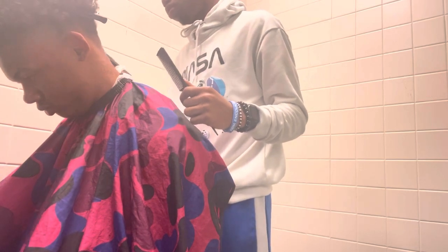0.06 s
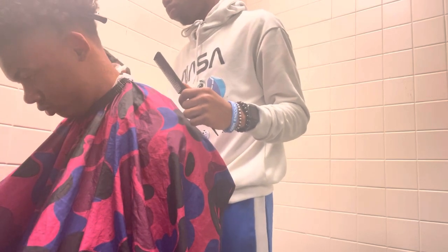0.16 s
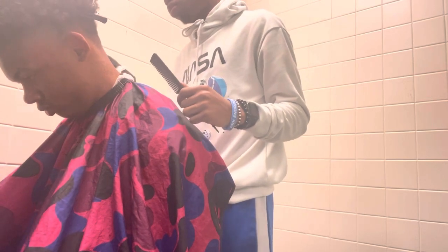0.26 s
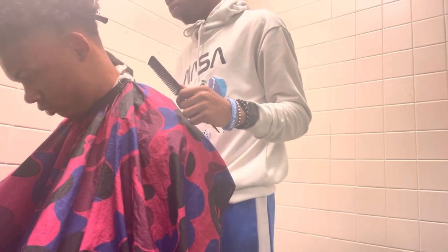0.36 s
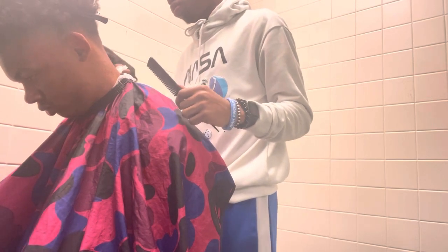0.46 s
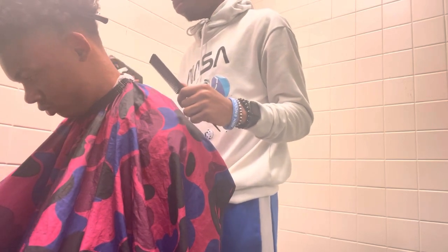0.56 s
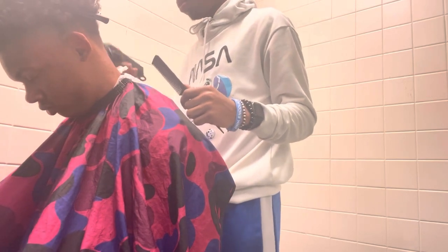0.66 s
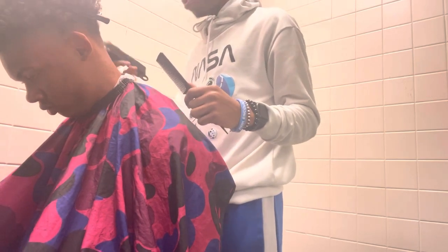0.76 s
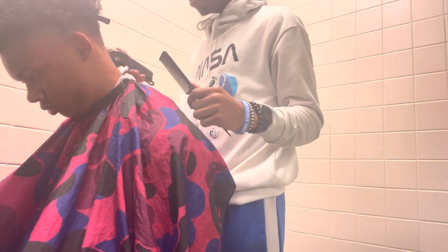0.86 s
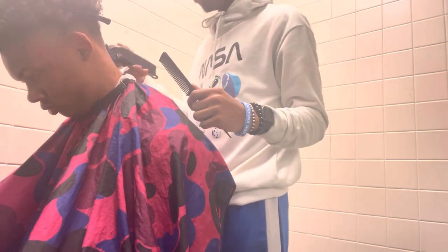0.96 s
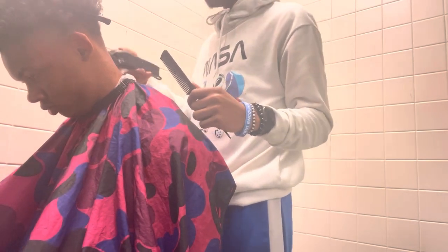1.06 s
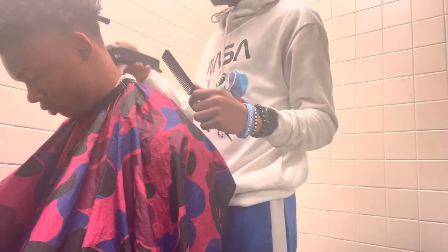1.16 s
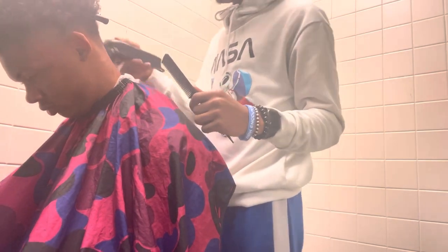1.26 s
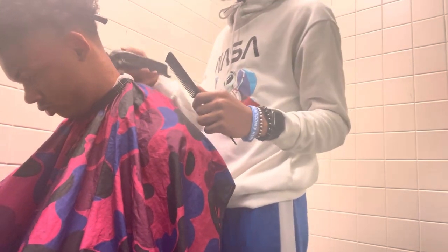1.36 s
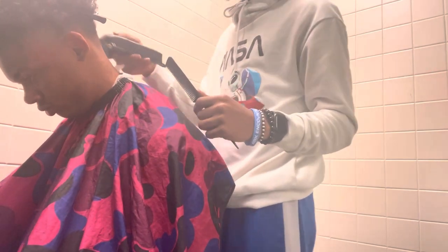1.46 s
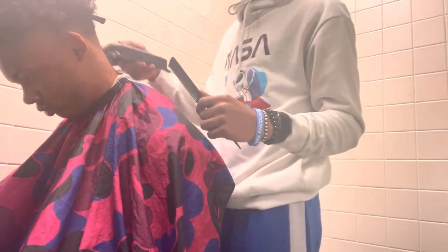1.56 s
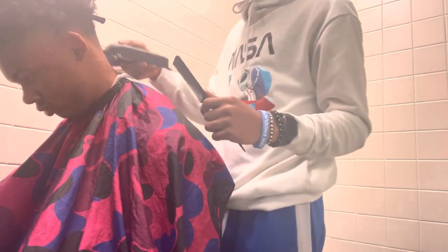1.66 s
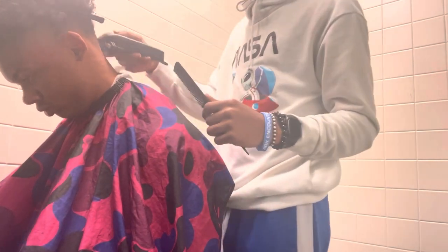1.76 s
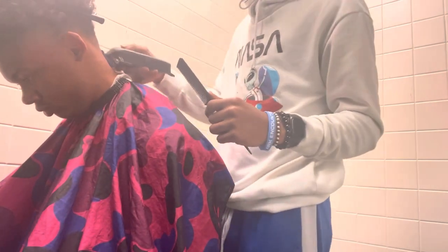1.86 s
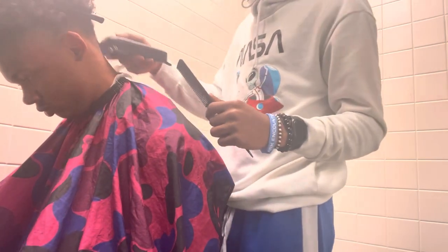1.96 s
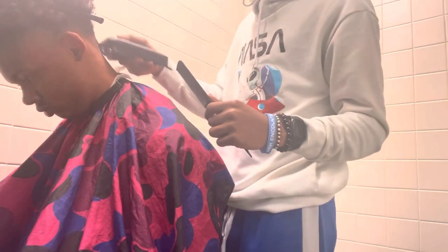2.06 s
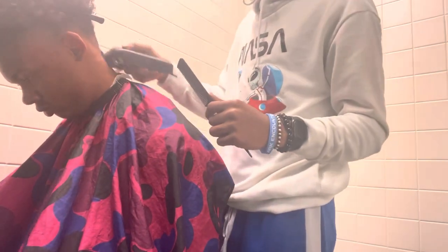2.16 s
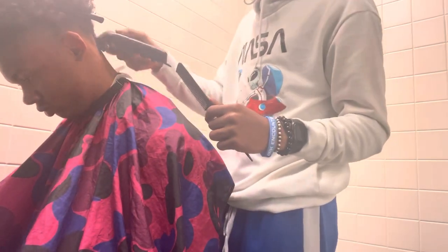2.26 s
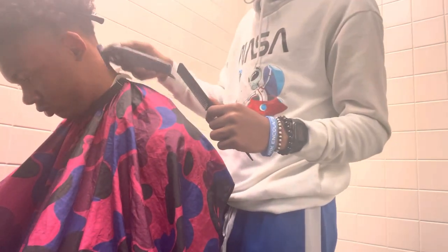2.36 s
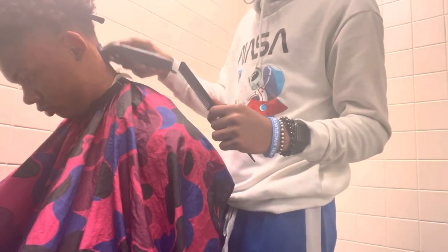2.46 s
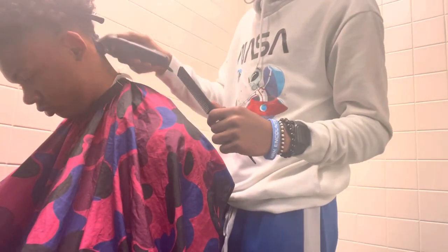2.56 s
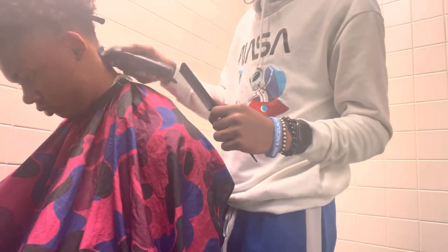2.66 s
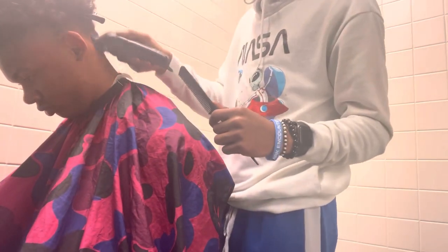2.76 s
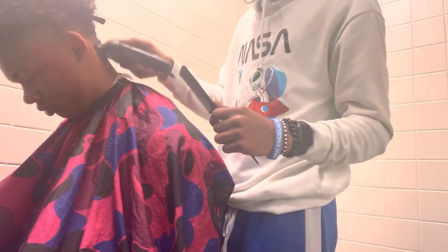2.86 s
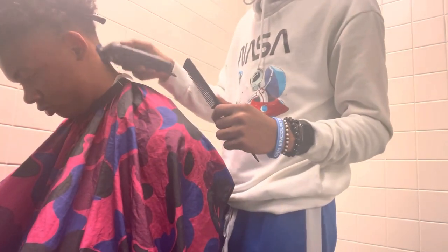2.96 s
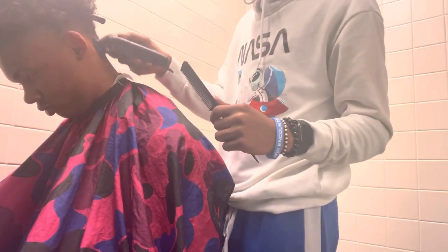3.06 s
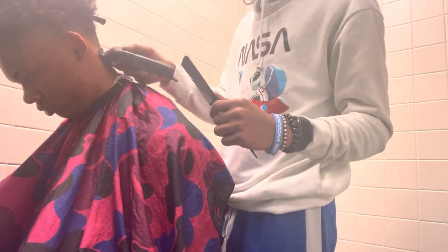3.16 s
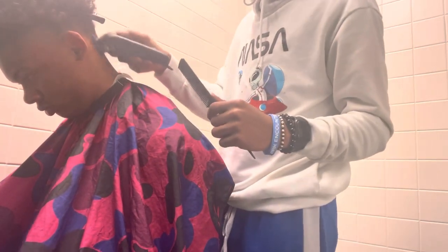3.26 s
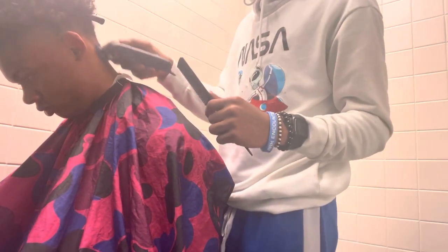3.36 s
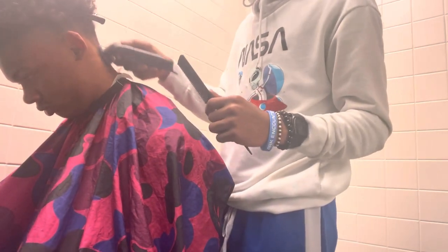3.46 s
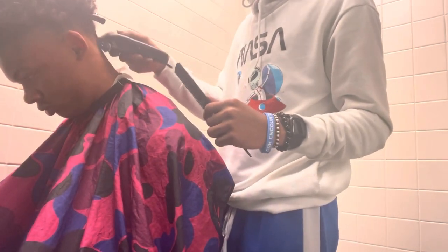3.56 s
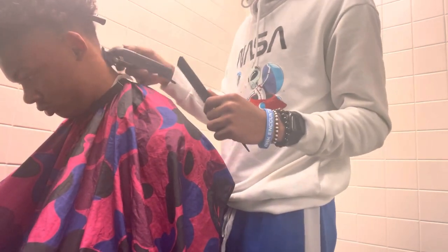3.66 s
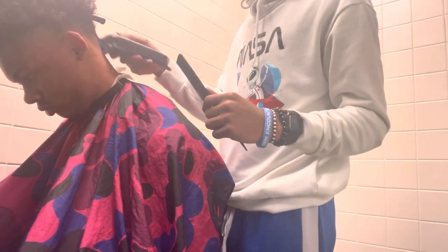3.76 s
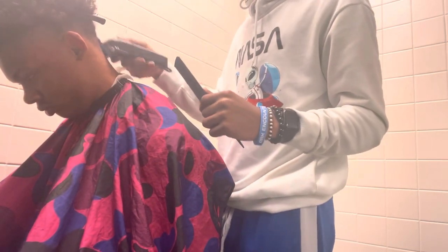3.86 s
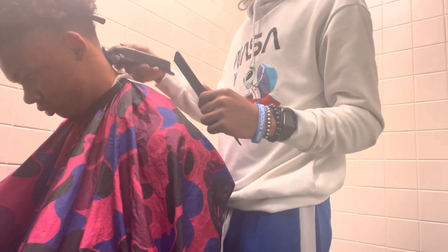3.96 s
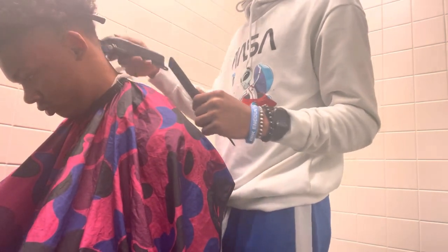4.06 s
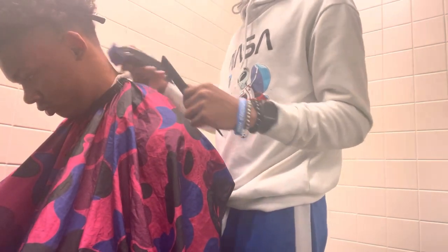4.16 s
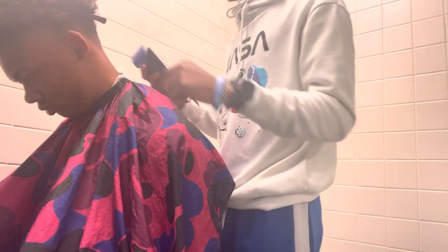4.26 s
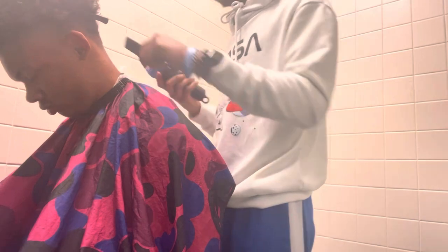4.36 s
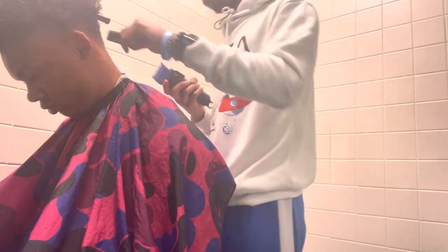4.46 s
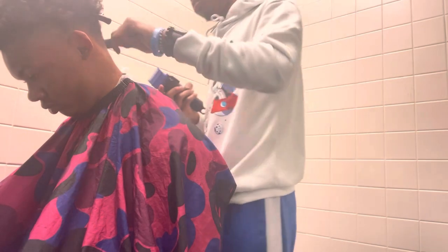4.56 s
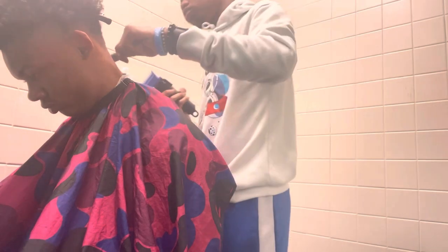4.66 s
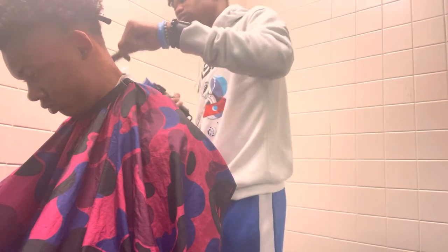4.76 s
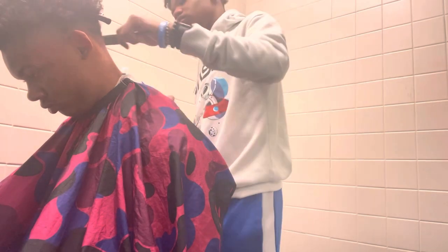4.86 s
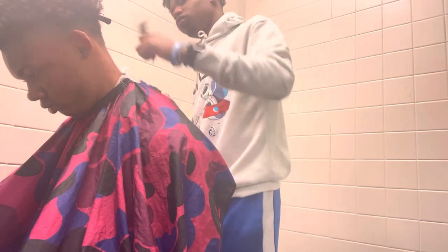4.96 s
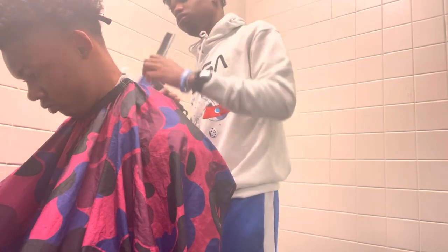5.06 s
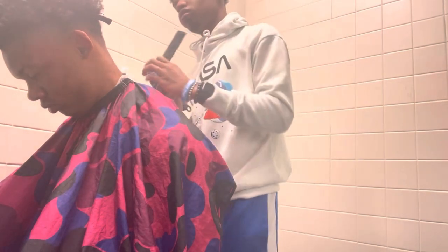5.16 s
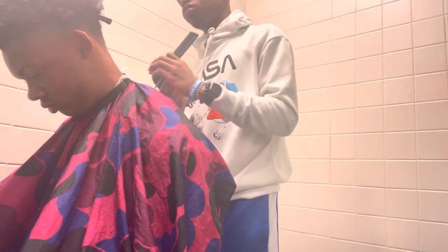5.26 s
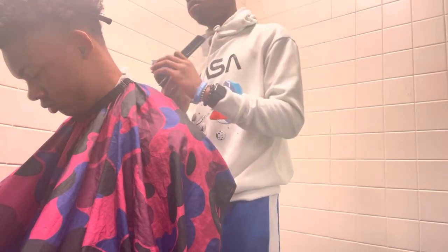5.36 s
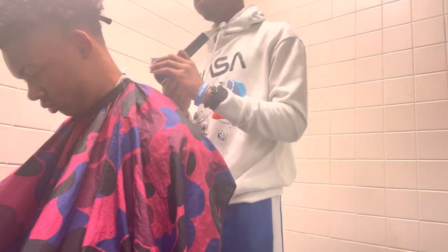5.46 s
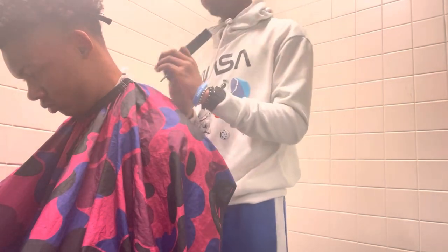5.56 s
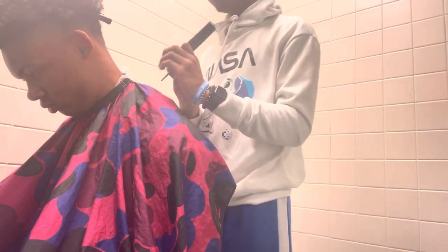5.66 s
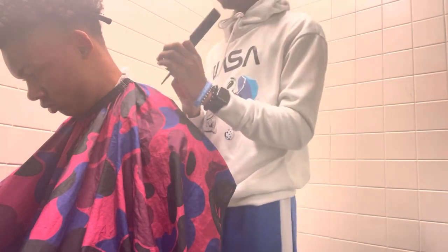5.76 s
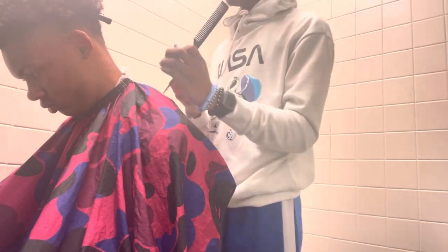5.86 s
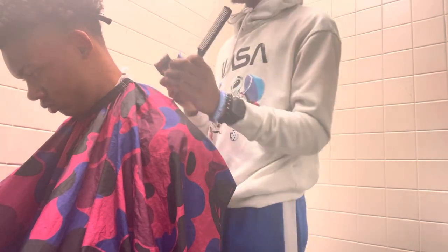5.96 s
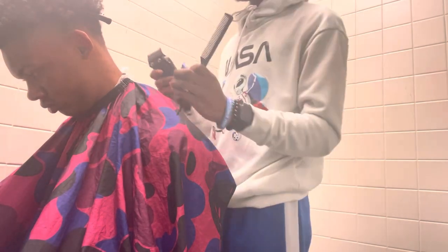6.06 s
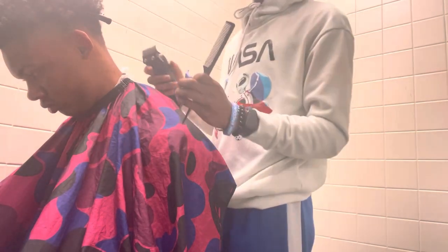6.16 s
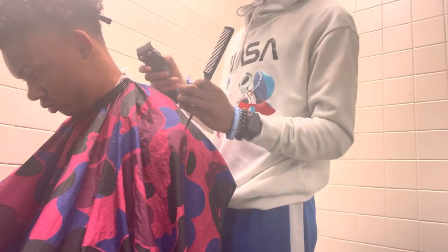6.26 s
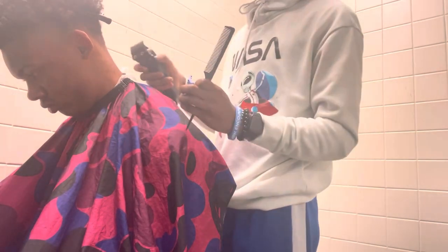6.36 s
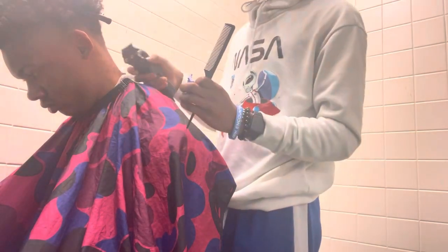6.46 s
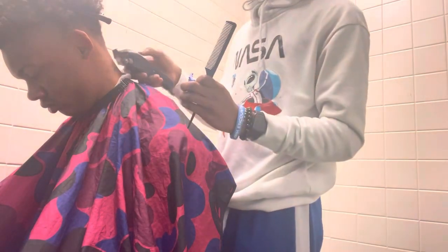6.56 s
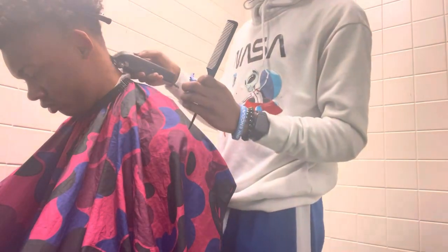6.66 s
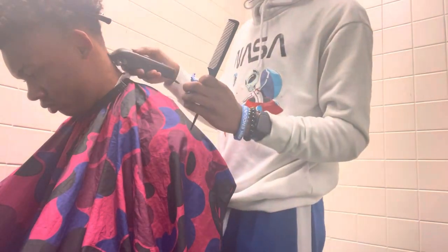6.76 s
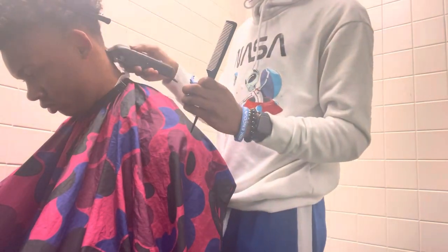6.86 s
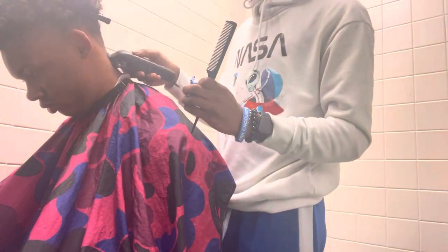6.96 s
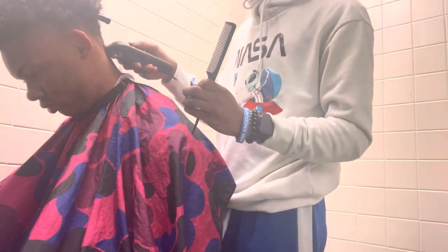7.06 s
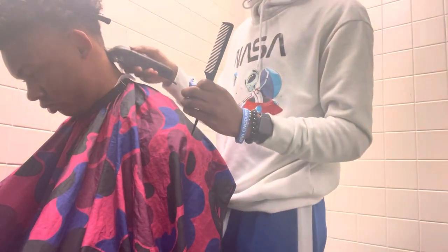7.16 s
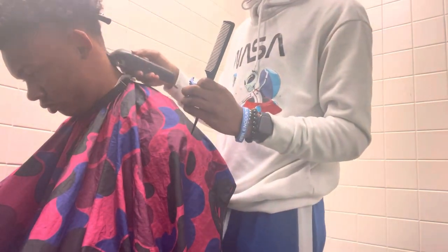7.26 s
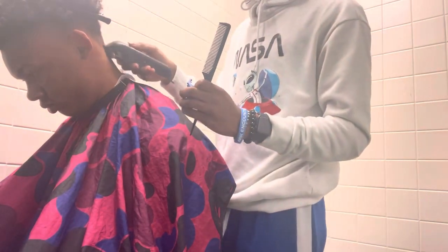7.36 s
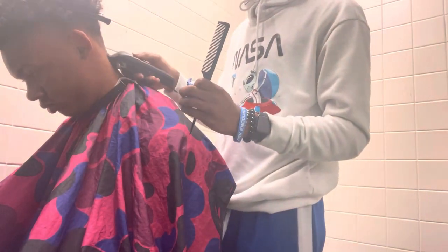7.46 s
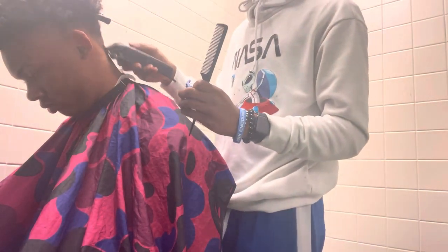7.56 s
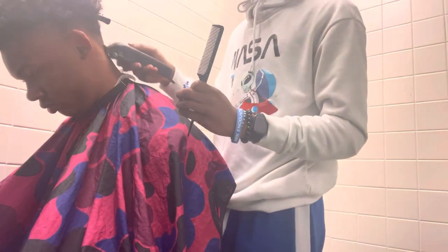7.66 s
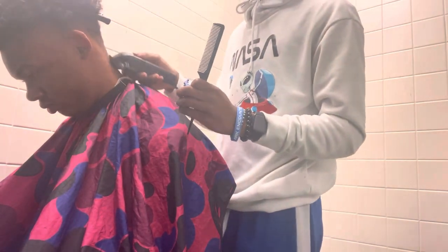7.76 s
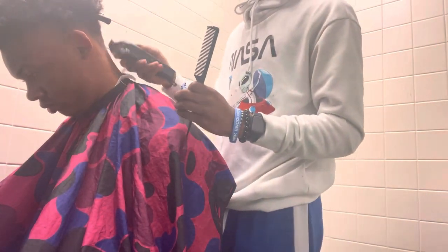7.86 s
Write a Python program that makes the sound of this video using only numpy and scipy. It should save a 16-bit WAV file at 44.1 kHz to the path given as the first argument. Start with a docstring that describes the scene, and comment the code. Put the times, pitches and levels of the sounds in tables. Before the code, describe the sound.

Close stereo pickup in a small, hard tiled room with a faint low ventilation rumble throughout. From 0 s electric hair clippers buzz at a nearly constant low pitch, around 120 strokes a second, with a raspy middle, metallic sizzle and fine crunch of hair. Gentle rocking makes the timbre pulse nearly four times a second; from about 1.2 to 4.1 s it grows fuller and more knocking as the blade lies against the head. Around 4.3 s there is a small tap and the buzz thins as it is lifted. At 4.9 s the switch snaps sharply and the blades clatter briefly to rest. Between 5.2 and 5.8 s only light taps, scuffs and dull hollow knocks are heard, with a short room tail. At 5.9 s crisp clicks switch it on, the blades rattle up within a fraction of a second, and the pulsing, crackling buzz continues until about 7.9 s.

```python
"""A small tiled room: electric hair clippers buzz at about 120 strokes a second and crackle through hair.
Blade and housing partials make the buzz; they shift as the head is laid onto the nape and rocked.
The switch snaps off and the blades clatter to rest, filtered noise pulsing with the slowing strokes.
The head is handled for a second in taps and knocks, then the switch snaps on and the blades rattle up.
Clicks, taps and clatter excite the room's tail; shaped noise is a low ventilation rumble underneath."""
import sys
import numpy as np
from scipy import signal
from scipy.fft import rfft, irfft, next_fast_len
from scipy.io import wavfile
from scipy.ndimage import uniform_filter1d, map_coordinates

SR = 44100
rng = np.random.default_rng(int(sys.argv[2]) if len(sys.argv) > 2 else 0)


def persist_wave(psi):
    """Save psi, clipped to +-1, as 16-bit WAV."""
    counts = np.round(np.clip(psi, -1, 1) * 32767).astype(np.int16)
    wavfile.write(sys.argv[1], SR, np.atleast_2d(counts).T)


N = 349259
T = np.arange(N) / SR
FRAME = 441  # samples per control frame
FRAME_T = np.arange(N // FRAME + 2) * FRAME / SR
CUTOFF_HZ = 14000

# ventilation colour: [f/Hz, relative level/dB per Hz]
VENT_COLOUR = [(18, -35), (28, -2), (40, -6), (54, 2.5), (75, -4.5), (100, -14.5), (120, -2.5),
               (150, -15.5), (185, -11), (240, -14), (330, -24), (600, -31.5), (1500, -46), (14000, -60.5)]
VENT_DB = -49
# likeness of the ventilation at the two microphones: [f/Hz, likeness 0-1]
VENT_LIKENESS = [(60, .98), (130, .92), (260, .55), (600, .1), (2000, 0)]

# the motor is switched off, switched on, and back at full swing (s)
OFF_S, CLOSED_S, ON_S = 4.895, 5.9, 6.08
SPIN_UP_S = .045  # time constant of the swing building up
# how far the clipper is laid over towards the nape, 0 = lifted clear: [t/s, angle/degrees]
ANGLE = [(0, 15), (.4, 18), (.9, 34), (1.5, 52), (2, 60), (2.4, 75), (2.8, 80), (3.4, 77), (3.8, 61),
         (4.14, 58), (4.25, 38), (4.5, 2), (4.86, 0), (6.06, 36), (6.35, 36), (6.75, 78), (7.45, 79),
         (7.9, 52)]
# the head counts as lifted below the first angle and as laid on above the second (degrees)
LAID_DEGREES = (35, 75)
# spells of rocking against the skin: [first push t/s, last push t/s, pushes per s, relative depth]
ROCKING = [(.19, 1.0, 3.75, .75), (1.26, 4.04, 3.957, 1.1), (6.3, 6.85, 3.6, .5), (7.11, 7.85, 4.05, .85)]
# stroke rate running free, and its sag as the head is laid on and with each push
FREE_HZ, SAG_HZ_PER_DEGREE, SAG_HZ_PER_PUSH = 119.75, .0035, .17

# clean partials of armature and housing: [order, level gained on a push/dB, lag behind the push/s]
HOUSING = [(1, 1.6, -.02), (5, -1, 0), (6, .5, .03), (8, -2, .04), (9, 1.3, 0), (11, -2.6, .054),
           (12, 1, 0), (19, 3.3, 0), (15, -1.9, .045)]
# directivity of all but the last housing partial: one row each, [level/dB at each angle below]
DIRECTIVITY = [(-66, -51, -60, -52, -49.5), (-56, -55, -55, -67, -61), (-58, -57, -61, -54, -47.5),
               (-57, -48.5, -49, -57, -60), (-53.5, -62, -49.5, -50, -51), (-64, -61, -56, -52, -52.5),
               (-55, -54, -52, -56, -59), (-65, -58, -54, -54, -53.5)]
DIRECTIVITY_DEGREES = (0, 20, 40, 60, 80)
# the last housing partial sits on the resonance of the head: [t/s, level/dB]
RING = [(0, -54.5), (1.1, -51), (1.3, -47), (1.48, -42.5), (2.08, -41), (2.4, -47), (3.45, -49), (3.8, -41),
        (4.15, -43), (4.26, -64), (4.86, -60), (6.06, -58), (7.9, -58)]
HOUSING_GAIN_DB = 0.38  # added to both tables above
HOUSING_WAVER = .24  # how much room echoes make the housing partials waver
# place of each housing partial between the microphones:
# [left-right level/dB lifted, laid on, left leads by/radians lifted, laid on]
PLACES = [(0, -.5, 0, -.1), (8, 0, 1.4, 1.5), (0, 9, 2.8, 1.9), (0, 5, 2.1, 3), (5, 15, .7, 1.8),
          (2, 7, .2, .9), (1, 2, 2.1, 2), (0, -1, .4, .7), (-1, 0, -.3, -.1)]

# colour of the blade partials; from order 12 up only its shape within a register counts:
# [f/Hz, level/dB per partial]
BLADE_COLOUR = [(240, -62.5), (360, -68.5), (480, -67.5), (840, -58), (1200, -57.5), (1700, -59),
                (2600, -59.5), (3200, -65.5), (3700, -63), (4300, -61), (5000, -65.5), (6900, -57),
                (8600, -66.5), (12600, -70), (14200, -74)]
# blade partials that stand out or are nearly missing: [order, relative level/dB]
STANDING = [(10, 0), (16, -0.5), (18, -1), (21, -0.5), (22, 3), (23, -1.5), (27, 3.5), (30, -2.5),
            (31, -5.5), (33, -0.5), (36, 1.5), (37, -6), (38, -9), (39, 2.5), (40, -6), (42, 3), (43, -20),
            (44, 2), (45, -2), (47, 4), (48, -2.5), (50, 1), (51, -13), (52, 5), (56, 1), (58, 6),
            (60, -13), (64, 5.5)]
# levels of the three registers of the blade rattle: [t/s, knock level/dB, rasp level/dB, sizzle level/dB]
RATTLE = [(0, -48, -47.5, -49.5), (0.65, -51, -46.5, -50.5), (1.1, -46.5, -44.5, -48.5),
          (1.27, -42, -44.5, -46.5), (1.55, -45.5, -46.5, -46), (2.05, -47, -45.5, -47),
          (2.3, -41.5, -47, -48), (2.7, -40, -47, -48), (3.5, -41.5, -47.5, -48), (4.2, -50.5, -45.5, -47),
          (4.5, -57, -53, -48), (4.86, -53, -50, -49.5), (6.06, -51, -51, -47), (6.7, -46, -48.5, -47.5),
          (7.25, -46, -51, -49.5), (7.9, -47.5, -46.5, -47.5)]
RATTLE_PUSH_DB = (-2.3, -1.3, 0.3)  # what a push adds to knock, rasp and sizzle
# likeness of the buzz at the two microphones: [f/Hz, likeness 0-1]
BLADE_LIKENESS = [(1000, 0.8), (4000, 0.35), (8000, 1), (13000, 1)]
# phase by which blade and hair reach the left microphone first: [f/Hz, lead/radians]
LEAD = [(0, 0), (950, 2.7), (1290, 0.5), (1810, 6.5), (3010, 7.1), (5250, 13.8), (6630, 15.4), (7490, 14.7),
        (9560, 16.1), (11100, 18.9), (12300, 18.9), (13400, 21.8), (15200, 22.0), (16100, 24.7)]
# balance of the blade partials: [f/Hz, left-right level/dB]
TILT = [(240, -7.5), (400, 0.5), (1000, 0), (1550, 7), (1900, 1), (4500, 2), (6000, 0), (9000, 1.5),
        (13000, 0)]
# strength of the return stroke, and how fast the paths of the partials change (per s at 1 kHz)
BACK_STROKE, CHANGE_PER_S = .15, 1.6
FLICKER = .18  # how much loose play makes the partials flicker
# the resonance of the blade plate shifts with the grip: [t/s, f/Hz]
PLATE = [(0, 2700), (.22, 3200), (.5, 2700), (.8, 3700), (.95, 3000), (1.25, 2400), (1.85, 3150),
         (2.3, 2750), (3.4, 2750), (3.85, 3100), (4.1, 2750), (4.3, 3750), (4.62, 3700), (4.86, 2700),
         (6.06, 3400), (6.4, 3850), (6.55, 2850), (7.9, 2800)]
PLATE_DB, PLATE_WIDTH_HZ = 6, 300
# two resonances of the head: [f/Hz, width/Hz, relative level/dB, level gained on a push/dB]
KNOCK_MODES = [(1595, 210, 0, -7), (2070, 270, -4.5, 7.5)]
KNOCK_SKIRT = .08  # gain of the knock outside its resonances
KNOCK_DIRECT = (.15, .55)  # share of the knock straight from the head: lifted, laid on
# echo of the blade off the skin: strength, and a delay that grows with the angle
SKIN_ECHO, SKIN_DELAY_S, SKIN_DELAY_S_PER_DEGREE = 0.11, 0.00075, .000004
# single partials ring out for a moment as the clipper turns: [t/s, order, level/dB, spread/s]
FLARES = [(.98, 12, -52, .06), (1.26, 19, -50, .06), (1.26, 17, -49, .06), (1.4, 14, -49, .2),
          (2.53, 17, -47, .05), (4.3, 9, -52, .08), (4.31, 31, -55, .07), (4.31, 33, -56, .06),
          (4.34, 12, -46, .06), (4.62, 31, -55, .07), (4.78, 10, -48, .1), (6.27, 50, -57, .08),
          (6.32, 22, -52, .1), (6.36, 32, -54, .11), (7.1, 39, -61, .35), (7.35, 19, -50.5, .5)]

# colour of the hair being cut: [f/Hz, relative level/dB per Hz]
CUT_COLOUR = [(200, -52.5), (500, -18.5), (1000, -9), (1500, -3), (2000, -1), (2700, -6), (3500, -5),
              (5000, -14), (7000, -4.5), (9000, -34.5), (13000, -14.5), (14500, -50)]
# crunch when lifted clear, before the gain in cutting(), and what a push and each degree of lean add
CUT_DB, CUT_PUSH_DB, CUT_DB_PER_DEGREE = -67.2, 3, .09
# the teeth bite into thicker tufts: [t/s, level/dB before the gain in cutting()]
BITES = [(.48, -59), (1.8, -56), (2.24, -63), (3.08, -64), (3.36, -72), (7.085, -57), (7.39, -61.5),
         (7.58, -65), (7.635, -55.5)]
BITE_S = 0.04  # spread of each swell
# steel sliding on steel: [f/Hz, relative level/dB per Hz]
SLIDE_COLOUR = [(300, -5), (1500, -6), (3000, -9), (5000, -4), (7000, 1), (9000, -1), (12800, -5.5),
                (14500, -25)]
SLIDE_DB = -56.5

# taps, scuffs and soft low rubs: [t/s, level/dB, brightest f/Hz, decay/s]
HANDLING = [(0.779, -63, 280, 0.082), (1.131, -67, 300, 0.75), (1.629, -48.5, 1100, 0.022),
            (4.368, -36, 6240, 0.0021), (5.232, -69, 6500, .004), (5.287, -67, 4500, 0.006),
            (5.505, -45.5, 7500, 0.0016), (5.506, -56, 2600, .004), (5.521, -53.5, 2390, 0.024),
            (5.552, -46.5, 5400, 0.004), (5.586, -58, 3600, .003), (5.657, -58, 5900, 0.021),
            (5.713, -48, 5100, 0.0048), (5.864, -52, 4940, 0.0036), (7.07, -56.5, 260, 0.13),
            (7.52, -52.5, 228, 0.3), (7.561, -60, 600, .045), (7.87, -51.5, 270, 0.13)]
RISE_SHARE = 0.36  # their rise time as a share of the decay
# hollow of the gripped body: [f/Hz, width/Hz, level/dB]
HOLLOW = [(514, 74, -7.5), (980, 79, 6), (1280, 44, 10.5)]
# decay of the tiled room: [f/Hz, t60/s]
ROOM_T60 = [(250, 0.52), (1300, 0.49), (3500, 0.52), (9000, 0.41), (14000, 0.18)]
# how much room the contacts stir up: [t/s, send level/dB]
ROOM_SEND = [(4.95, -4), (5.5, -6), (5.6, -7.5), (5.88, -4.5)]

# loose clatter of the blade coasting down: [f/Hz, relative level/dB per Hz]
COAST_COLOUR = [(150, -20), (380, 0), (1000, -1), (2000, -8), (4000, -25), (14000, -45)]
# loose clatter of the blade running up: [f/Hz, relative level/dB per Hz]
START_COLOUR = [(150, -25), (450, -7), (900, 0), (1500, -1), (2800, -8), (5000, -22), (14000, -35)]
COAST_DB, START_DB = -49, -45.5
COAST_S, RUN_UP_S = .085, .155  # time scales of the motor coasting down and running up

# switch contacts: [t/s, level/dB before the gain in switch(), brightest f/Hz, left-right level/dB]
SWITCH = [(4.8993, -13, 2650, 4.5), (4.8994, -15, 9500, 5), (4.9014, -20, 4840, 3), (4.9054, -9, 2400, 2),
          (4.905, -17, 7000, -10), (5.8984, -9.5, 3900, -2), (5.8979, -7.5, 5940, 1), (5.899, -25, 1900, 9),
          (5.901, -22, 10260, 4), (5.9042, -20, 6481, 15), (5.9072, -17, 7550, -10)]
# ringing of switch and shell: [f/Hz, relative level/dB, t60/s]
SHELL = [(1244, -2, .006), (1880, -12, .012), (2164, -7, .016), (2520, -2, .012), (2790, -2, .014),
         (3240, -6, .012), (3660, -2, .013), (4011, -2, .014), (4770, -2, .012), (5200, -3, .011),
         (5561, -1, .014), (6200, -3, .01), (6718, -1, .014), (7316, 0, .012), (7881, -5, .011),
         (8770, -10, .008), (9940, -5, .007), (10820, -4, .008), (12440, -5, .008)]
SWITCH_LAG_S = .00006  # the shell's ring reaches the right microphone this much later
# the closed hand knocks against the body, mostly in short stumbles: [t/s, level/dB, brightest f/Hz]
KNOCKS = [(5.549, -47, 1300), (5.553, -38, 700), (5.557, -40, 1100), (5.644, -46, 750), (5.654, -45, 1200),
          (5.66, -38.5, 1450), (5.665, -44, 1200), (5.713, -48, 900)]
# ringing of the gripped body: [f/Hz, relative level/dB, t60/s]
BODY = [(470, 0, .035), (795, -2, .04), (905, -1, .045), (1297, 0, .045), (1410, -4, .035),
        (1780, -5, .025), (1954, -9, .04)]
KNOCK_CONTACT_S = .0004  # a soft hand spreads each knock over this time


def from_db(db):
    """Decibels to gain."""
    return 10 ** (np.asarray(db) / 20)


def rms_one(x):
    """Scale to unit rms."""
    return x / np.sqrt(np.mean(np.abs(x) ** 2) + 1e-20)


def curves(rows, t):
    """Each column of a table at times t."""
    s, *columns = np.transpose(rows)
    return [np.interp(t, s, column) for column in columns]


def at_hz(points, hz):
    """Read a table on a log-frequency axis."""
    f, value = np.transpose(points)
    return np.interp(np.log(hz + 1), np.log(np.abs(f) + 1), value)


def bins(size):
    """Frequencies of a real FFT."""
    return np.fft.rfftfreq(size, 1 / SR)


def pan(db):
    """Left and right gains of equal total power."""
    pair = from_db(np.array([db, -db]) / 2)
    return pair / np.sqrt(np.mean(pair ** 2, axis=0))


def wander(per_s):
    """Slow complex random drift of unit power, frames x rates."""
    f = np.fft.fftfreq(len(FRAME_T), FRAME / SR)[:, None]
    shape = np.exp(-(f / per_s) ** 2 / 2)
    white = rng.standard_normal(shape.shape) + 1j * rng.standard_normal(shape.shape)
    unit_power = np.sqrt(2 * np.mean(shape ** 2, axis=0))
    return np.fft.ifft(white * shape / unit_power, axis=0, norm="ortho")


def ventilation():
    """Steady rumble of shaped noise, nearly the same at both microphones in the bass."""
    size = next_fast_len(N)
    f = bins(size)
    mid, side = rfft(rng.standard_normal((2, size)))
    alike = np.clip(at_hz(VENT_LIKENESS, f), 0, 1)
    pair = np.sqrt(1 + alike) * mid + np.sqrt(1 - alike) * side * [[1], [-1]]
    rumble = irfft(pair * from_db(at_hz(VENT_COLOUR, f)), size)[:, :N]
    return from_db(VENT_DB) * rms_one(rumble)


def angle(t):
    """Angle of the clipper in degrees."""
    return curves(ANGLE, t)[0]


def laid_on(lifted, laid):
    """A value per frame that passes from its lifted to its laid-on state."""
    return np.interp(angle(FRAME_T), LAID_DEGREES, (lifted, laid))


def rocking(t, end_share=0.64):
    """The wrist rocks evenly, widest mid-spell: positive on a push, negative on the way back."""
    out = np.zeros(len(t))
    for first, last, per_s, depth in ROCKING:
        gate = np.clip(2 * per_s * np.minimum(t - first, last - t) + 2, 0, 1)
        progress = np.clip((t - first) / (last - first), 0, 1)
        arch = end_share + (1 - end_share) * np.sin(np.pi * progress)
        out += depth * gate * arch * np.cos(2 * np.pi * per_s * (t - first))
    return out


def stroke_hz(t):
    """The motor slows a little under load."""
    return FREE_HZ - SAG_HZ_PER_DEGREE * angle(t) - SAG_HZ_PER_PUSH * rocking(t)


def running(t, fade_db_per_s=115):
    """The buzz dies away after switch-off and builds up once the switch has closed."""
    dying = from_db(-fade_db_per_s * np.maximum(t - OFF_S, 0))
    building = (t > CLOSED_S) * np.exp(np.minimum(t - ON_S, 0) / SPIN_UP_S)
    return np.maximum(dying, building)


def blade_rings(hz, lean, chatter_per_s=14):
    """Partials arrive by paths that change slowly and with the lean; loose play makes them flicker."""
    rates = .3 + CHANGE_PER_S * hz / 1000 / np.sqrt(1 + hz / 6000)
    alike = np.clip(at_hz(BLADE_LIKENESS, hz), 0, 1)
    shared = np.cos(lean)[:, None] * wander(rates) + np.sin(lean)[:, None] * wander(rates)
    shared = shared + FLICKER * wander(np.full(len(hz), chatter_per_s))
    separate = np.array([wander(rates), wander(rates)])
    return np.sqrt(alike) * shared + np.sqrt(1 - alike) * separate


def head_resonances(hz, push):
    """Gain per frame and partial of the two resonances of the head, which rocking favours in turn."""
    gain = KNOCK_SKIRT
    for centre, width, db, push_db in KNOCK_MODES:
        peak = from_db(db + push_db * push)[:, None]
        gain = gain + peak / (1 + ((hz - centre) / width) ** 2) ** 2
    return gain


def skin_echo(hz):
    """A short reflection lifts some partials and sinks others; the pattern slides with the angle."""
    delay = SKIN_DELAY_S + SKIN_DELAY_S_PER_DEGREE * angle(FRAME_T)
    return 1 + SKIN_ECHO * np.exp(-2j * np.pi * np.outer(delay, hz))


def plate_resonance(hz):
    """Gain per frame and partial of the shifting resonance of the blade plate."""
    centre_hz, = curves(PLATE, FRAME_T)
    return from_db(PLATE_DB / (1 + ((hz - centre_hz[:, None]) / PLATE_WIDTH_HZ) ** 2))


def blade_partials(hz, ring=0.25, diffuse=0.83, lean_radians=1.12):
    """The blade strikes at both ends of its travel, giving a low knock, a rasp and a high sizzle."""
    push = rocking(FRAME_T)
    register_db = curves(RATTLE, FRAME_T) + np.outer(RATTLE_PUSH_DB, push)
    cycle = irfft(blade_rings(hz, lean_radians * push))
    turn = np.arange(cycle.shape[-1]) / cycle.shape[-1]
    return_strike = BACK_STROKE * np.exp(-((turn - .46) % 1) / ring)
    strikes = diffuse + np.exp(-turn / ring) + return_strike
    partials = rms_one(rfft(cycle * strikes))
    order = np.arange(len(hz))
    knock, rasp, sizzle = (order >= 12) & (order < 19), (order >= 19) & (order < 34), order >= 34
    # part of the knock comes straight from the head, one crisp blow a stroke
    direct = laid_on(*KNOCK_DIRECT)[:, None]
    blows = direct + (1 - direct) * partials[..., knock]
    partials[..., knock] = blows * head_resonances(hz[knock], push)
    partials[..., sizzle] *= skin_echo(hz[sizzle])
    partials *= from_db(at_hz(BLADE_COLOUR, hz)) * plate_resonance(hz)
    for k, standing_db in STANDING:
        partials[..., round(k)] *= from_db(standing_db)
    # leave room for the housing partials
    partials[..., [round(row[0]) for row in HOUSING]] = 0
    # bring each register to its level
    for zone, level_db in zip((knock, rasp, sizzle), register_db):
        frame_power = np.mean(np.sum(np.abs(partials[..., zone]) ** 2, axis=2), axis=0)
        power = uniform_filter1d(frame_power, size=5)
        partials[..., zone] *= (from_db(level_db) / np.sqrt(power))[:, None]
    partials[1] *= np.exp(-1j * np.interp(hz, *np.transpose(LEAD)))
    return partials * pan(at_hz(TILT, hz))[:, None]


def housing_levels():
    """Level in dB of each housing partial per frame, as the clipper turns and rocks."""
    turned = [np.interp(angle(FRAME_T), DIRECTIVITY_DEGREES, row) for row in DIRECTIVITY]
    pushed = np.array([push_db * rocking(FRAME_T - lag_s) for _, push_db, lag_s in HOUSING])
    return np.array(turned + curves(RING, FRAME_T)) + pushed + HOUSING_GAIN_DB


def flared(partials):
    """Swell the flaring partials, each in a smooth arch that steadies its phase."""
    out = partials.copy()
    for s, order, level_db, spread_s in FLARES:
        swell = from_db(level_db) * np.exp(-((FRAME_T - s) / spread_s) ** 2 / 2)
        centre_phase = np.angle(out[:, round(s * SR / FRAME), order])
        steady = swell * np.exp(1j * centre_phase)[:, None]
        phase = np.angle(out[..., order] + steady)
        out[..., order] = np.hypot(np.abs(out[..., order]), swell) * np.exp(1j * phase)
    return out


def buzz(strokes, phase_drift=0.24, size=2048):
    """Blade and housing partials make one cycle per frame, played at the stroke rate."""
    hz = np.arange(129) * np.mean(stroke_hz(FRAME_T))
    partials = blade_partials(hz)
    for (order, _, _), place, level_db in zip(HOUSING, PLACES, housing_levels()):
        side_db, lead = laid_on(*place[:2]), laid_on(*place[2:])
        drift = phase_drift * wander(np.array([.5]))[:, 0].real
        tone = from_db(level_db) * np.exp(1j * (drift + 2 * np.pi * rng.random()))
        echoes = 1 + HOUSING_WAVER * wander(np.array([2.5, 2.5])).T
        placing = pan(side_db) * np.exp(np.outer([0, -1j], lead))
        partials[..., round(order)] = tone * echoes * placing
    partials[..., 0] = 0
    cycles = irfft(flared(partials), size) * size / np.sqrt(2)
    where = [np.arange(N) / FRAME, strokes % 1 * size]
    played = [map_coordinates(c, where, order=1, mode="grid-wrap") for c in cycles]
    return np.array(played) * running(T)


def unsteady_hand(depth_db=1.71, per_s=11.0):
    """Small changes of grip and pressure make the buzz swell and sink."""
    sway = wander(np.array([per_s]))[:, 0].real
    return from_db(depth_db * np.interp(T, FRAME_T, sway))


def blade_noise(strokes, colour, grain_db=3.0, pulsing=0.15, likeness=0.44):
    """Dense uneven grains, bunched on each pass of the blade; rms 1."""
    sizes = from_db(grain_db * np.repeat(rng.standard_normal(N // 32 + 1), 32)[:N])
    passes = 1 + pulsing * np.cos(2 * np.pi * strokes)
    shared = np.sqrt(likeness) * rng.standard_normal(N)
    separate = np.sqrt(1 - likeness) * rng.standard_normal((2, N))
    grains = (shared + separate) * sizes * passes
    size = next_fast_len(N)
    spectrum = rfft(grains, size) * from_db(at_hz(colour, bins(size)))
    spectrum[1] *= np.exp(-1j * np.interp(bins(size), *np.transpose(LEAD)))
    return rms_one(irfft(spectrum, size)[:, :N])


def hair_flow():
    """Crunch amplitude: more hair as the head is laid on and on each push, a short swell per tuft."""
    tufts = sum(from_db(db) * np.exp(-((T - s) / BITE_S) ** 2 / 2) for s, db in BITES)
    steady_db = CUT_DB + CUT_DB_PER_DEGREE * angle(T) + CUT_PUSH_DB * rocking(T)
    return np.hypot(from_db(steady_db), tufts)


def cutting(strokes, gain_db=10.0):
    """Hairs crunch between the teeth over the even hiss of the sliding blade."""
    crunch = blade_noise(strokes, CUT_COLOUR) * hair_flow() * from_db(gain_db)
    slide = from_db(SLIDE_DB) * blade_noise(strokes, SLIDE_COLOUR)
    return (crunch + slide) * running(T)


def handling(octaves=0.72, size=32768):
    """Taps, scuffs and rubs: short noise bursts that ring in the hollow body."""
    out, f = np.zeros((2, N + size)), bins(size) + 1
    body = 1 + sum(from_db(db) / (1 + 2j * (f - hz) / width) for hz, width, db in HOLLOW)
    t = (np.arange(size) - size // 4) / SR  # the burst peaks at 0
    for s, level_db, bright_hz, decay in HANDLING:
        rise = RISE_SHARE * decay
        colour = rms_one(body * np.exp(-(np.log2(f / bright_hz) / octaves) ** 2 / 4))
        noise = rms_one(rng.standard_normal((2, size)) + rng.standard_normal(size))
        force = noise * np.exp(np.minimum(t / rise, -t / decay))
        i = round((s + t[0]) * SR)
        out[:, i:i + size] += from_db(level_db) * irfft(rfft(force) * colour)
    return out[:, :N]


def room(x):
    """Diffuse noise tail of the tiled room, different at each microphone and shorter in the treble."""
    t = T[:int(SR * .7)]
    white, tail = rfft(rng.standard_normal((2, len(t)))), 0
    edges = np.geomspace(100, SR / 2, num=10)
    for low, high in zip(edges, edges[1:]):
        band = irfft(white * ((bins(len(t)) >= low) & (bins(len(t)) < high)), len(t))
        tail = tail + band * from_db(-60 * t / at_hz(ROOM_T60, np.sqrt(low * high)))
    tail = tail * np.clip(t / 0.0042, 0, 1)  # soft onset
    unit_energy = rms_one(tail) / np.sqrt(len(t))
    return signal.fftconvolve(x, unit_energy, axes=1)[:, :N]


def clatter(ring=0.53):
    """Coasting down and running up, strokes clack in the slack of the drive, most at half speed."""
    off = T < CLOSED_S
    coasting = np.exp(-np.maximum(T - OFF_S, 0) / COAST_S)
    running_up = 1 - np.exp(-((T - CLOSED_S) / RUN_UP_S) ** 2)
    speed = np.where(off, coasting, running_up)
    strokes = np.cumsum(speed) * FREE_HZ / SR
    slack = (4 * speed * (1 - speed)) ** 2
    clacks = slack * rms_one(np.exp(-(strokes % 1) / ring))
    coast = from_db(COAST_DB) * blade_noise(strokes, COAST_COLOUR)
    start = from_db(START_DB) * blade_noise(strokes, START_COLOUR)
    return clacks * np.where(off, coast, start)


def struck(modes, bright_hz, octaves, t, spread_db=1.5):
    """One blow sets all modes ringing, most strongly those near its brightest frequency."""
    hz, mode_db, t60 = np.transpose(modes)[:, :, None]
    uneven = from_db(mode_db + spread_db * rng.standard_normal(hz.shape))
    weights = uneven * np.exp(-(np.log2(hz / bright_hz) / octaves) ** 2 / 2)
    decay = np.exp(-np.log(1000) * t / t60)
    rings = rng.choice([-1, 1], hz.shape) * np.sin(2 * np.pi * hz * t) * decay
    return np.sum(weights * rings, axis=0) / np.sqrt(np.sum(weights ** 2))


def at_microphones(x, size):
    """A sound reaches the right microphone a little later than the left."""
    delay = np.exp(-2j * np.pi * np.outer([0, SWITCH_LAG_S], bins(size)))
    return irfft(rfft(x, size) * delay, size)


def switch(octaves=0.44, crack=1.61, crack_s=0.0015, gain_db=-5.0, size=8192):
    """Each contact is a sharp crack and a ring of the small shell, which radiates little bass."""
    out, t = np.zeros((2, N)), T[:size]
    for s, level_db, bright_hz, side_db in SWITCH:
        shell = at_microphones(struck(SHELL, bright_hz, octaves, t), size)
        edges = [bright_hz * 0.71, min(bright_hz * 1.53, SR / 3)]
        band = signal.butter(1, edges, "band", fs=SR, output="sos")
        snap = rms_one(signal.sosfilt(band, rng.standard_normal((2, size)))) * np.exp(-t / crack_s)
        thin = signal.butter(4, bright_hz * 0.38, "high", fs=SR, output="sos")
        click = signal.sosfilt(thin, shell + crack * snap)
        i = round(s * SR)
        out[:, i:i + size] += click / 2 * from_db(level_db + gain_db) * pan(side_db)[:, None]
    return out


def knocks(octaves=1.0, size=8192):
    """Dull knocks of the hand set the hollow body ringing."""
    out, force = np.zeros((2, N)), np.hanning(round(KNOCK_CONTACT_S * SR))
    for s, level_db, bright_hz in KNOCKS:
        i = round(s * SR)
        ringing = struck(BODY, bright_hz, octaves, T[:size])
        out[:, i:i + size] += from_db(level_db) * signal.lfilter(force / force.sum(), 1, ringing)
    # the bass below the lowest body mode is thinned out
    return signal.sosfilt(signal.butter(2, BODY[0][0] * 0.56, "high", fs=SR, output="sos"), out)


def scene():
    """Buzz and cutting follow the strokes; clicks, taps and clatter ring out in the room."""
    strokes = np.cumsum(stroke_hz(T)) / SR
    clipper = buzz(strokes) * unsteady_hand() + cutting(strokes)
    contacts = handling() + clatter() + switch() + knocks()
    send_db, = curves(ROOM_SEND, T)
    return ventilation() + clipper + contacts + room(contacts * from_db(send_db))


def record(dry):
    """A steep low-pass cuts the top."""
    return signal.sosfilt(signal.ellip(10, .2, 80, CUTOFF_HZ, fs=SR, output="sos"), dry)


dry = scene()
out = record(dry)
persist_wave(out)
```